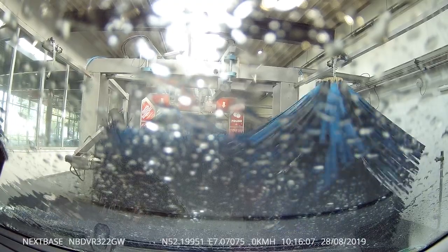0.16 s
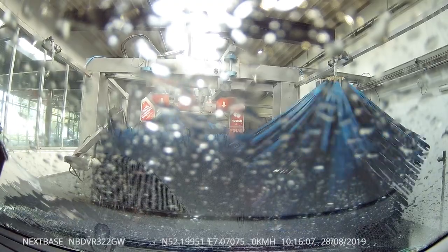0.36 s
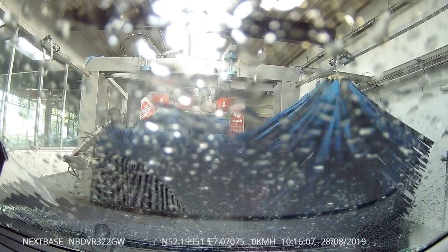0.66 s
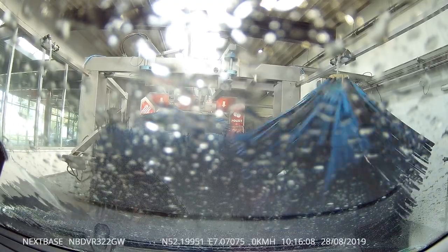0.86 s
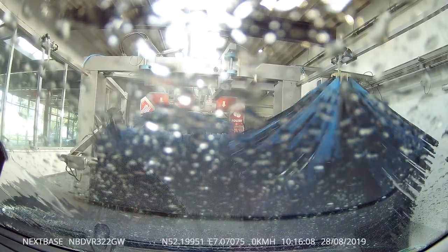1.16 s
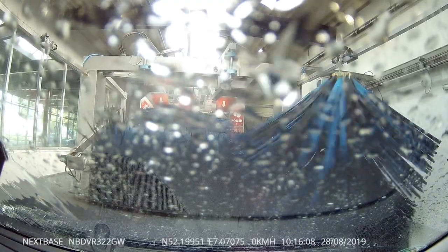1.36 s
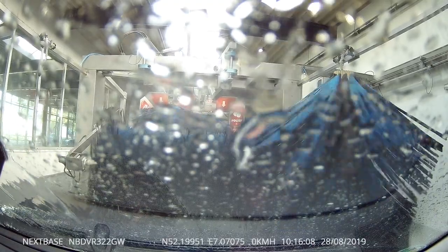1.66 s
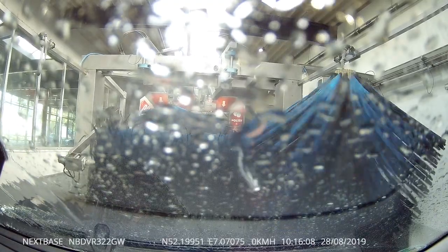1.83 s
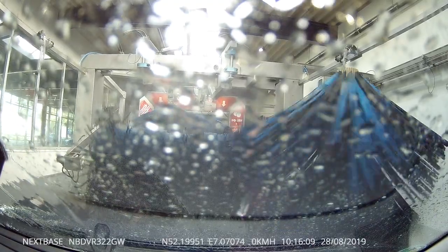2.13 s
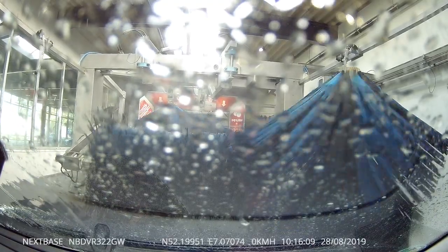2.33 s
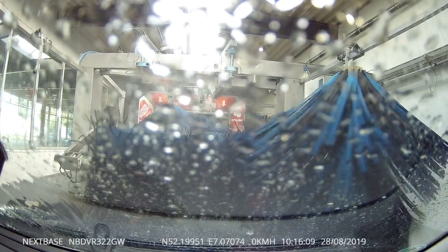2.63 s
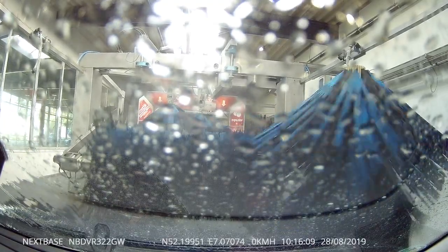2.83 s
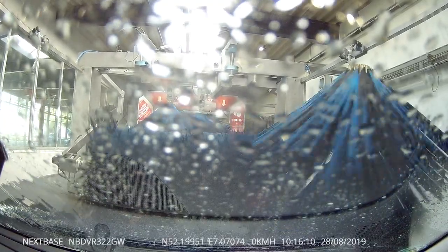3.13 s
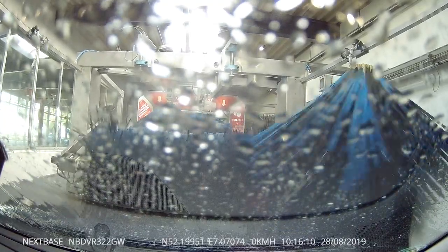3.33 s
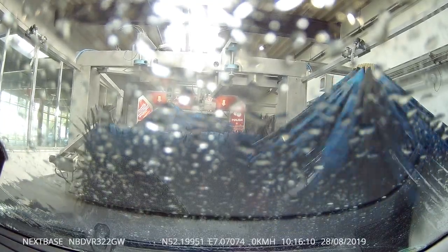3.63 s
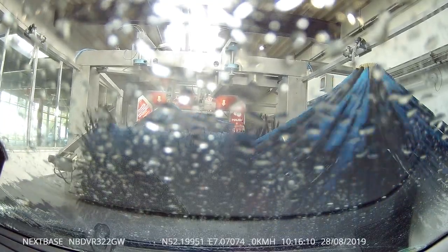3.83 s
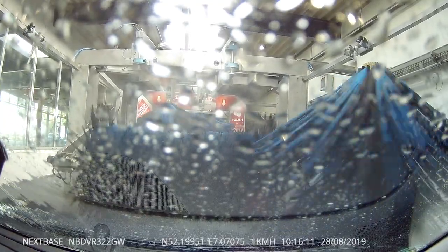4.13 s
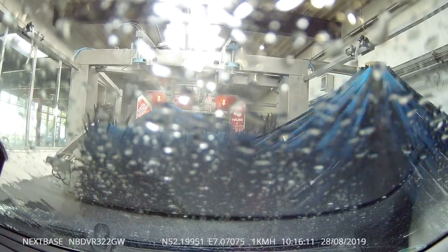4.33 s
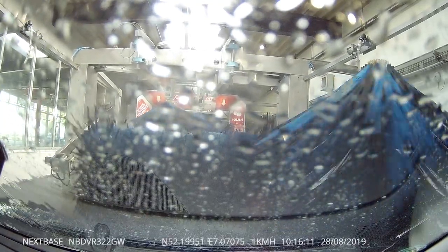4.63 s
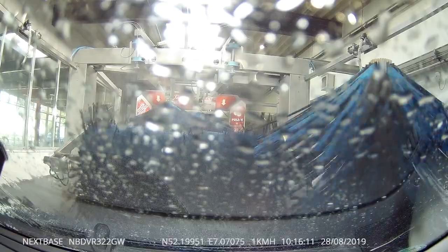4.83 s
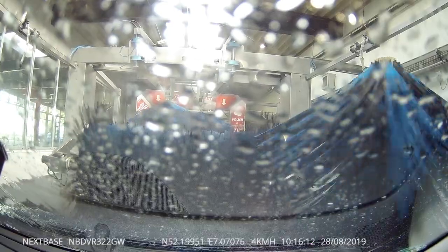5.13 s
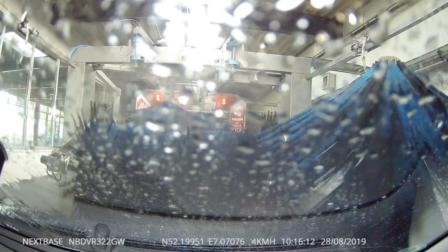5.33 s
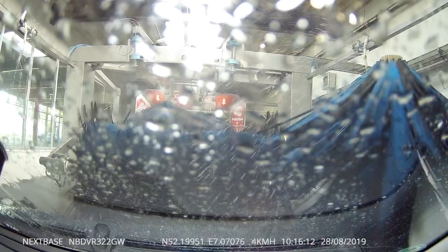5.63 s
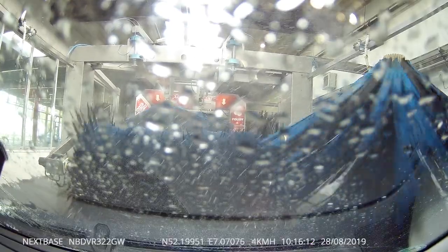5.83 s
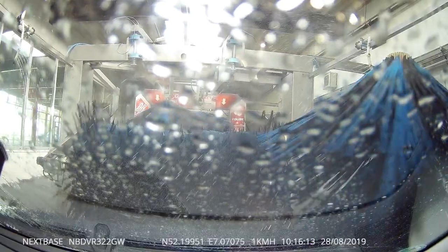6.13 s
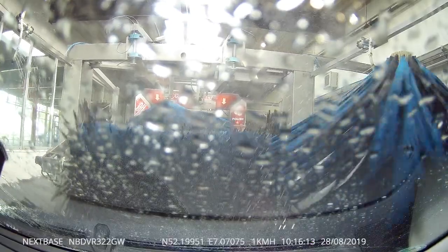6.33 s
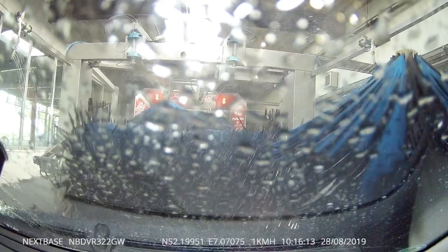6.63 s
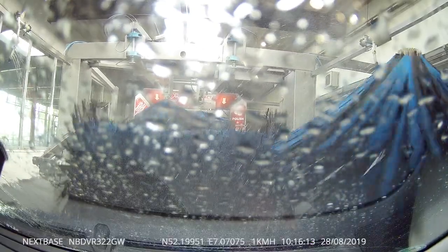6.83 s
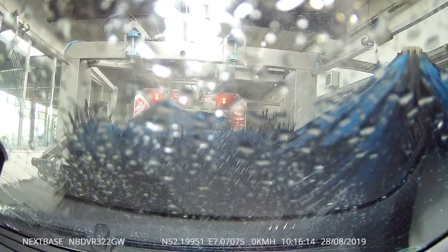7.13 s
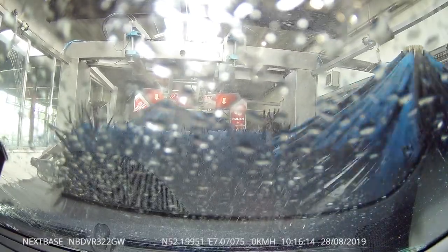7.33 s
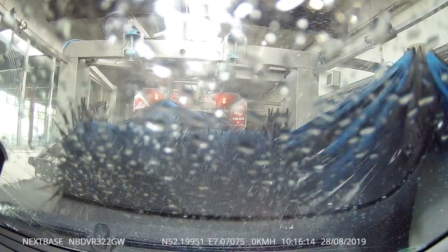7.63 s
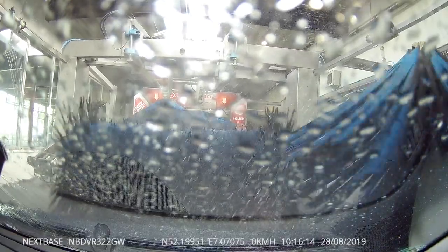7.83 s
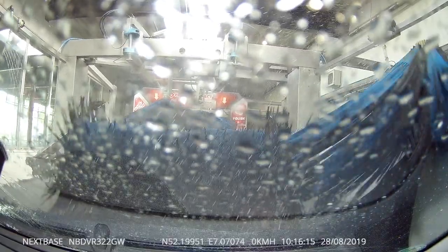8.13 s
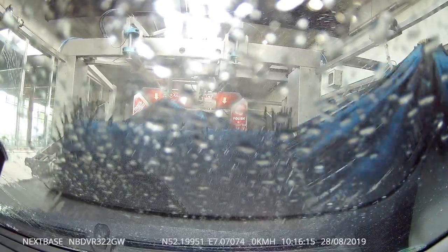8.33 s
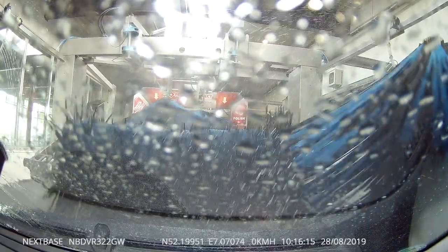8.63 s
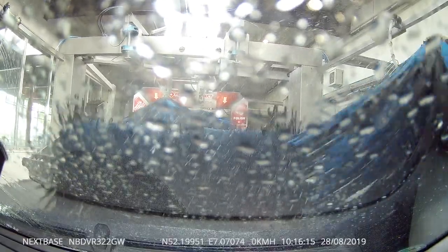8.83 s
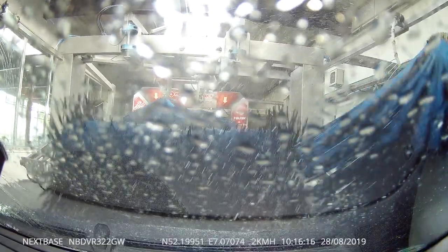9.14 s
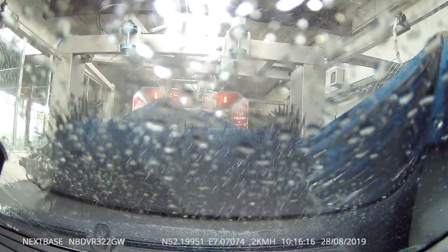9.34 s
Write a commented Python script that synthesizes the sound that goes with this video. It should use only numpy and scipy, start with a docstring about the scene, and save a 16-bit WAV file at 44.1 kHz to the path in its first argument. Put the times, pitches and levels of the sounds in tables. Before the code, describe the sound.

A close, dull, boxy cabin sound of spinning brushes working over a car. Irregular wet slaps and fine droplet ticks rattle on the glass, hollow knocks ring the metal, and low thuds push the air. It starts lighter, grows denser and boomier through the middle, then a wavering low drive hum rises, above faint steady hiss and a thin high warbling whine.

```python
"""Wet strips of spinning brushes lash the windscreen and drum on the bonnet, heard inside a car in a car wash.
Each strip is a tiny random impulse; the impulses clump, ring glass and panels, and make the closed cabin boom.
Lashes shed bursts of water ticks over a steady crackle of bristles and spray; strips knock on the metal.
Behind them a fluttering brush-drive hum grows as it nears, and a thin warbling whine sits over an even hiss."""
import sys
import numpy as np
from scipy import signal
from scipy.fft import rfft, irfft, next_fast_len
from scipy.io import wavfile
from scipy.ndimage import uniform_filter1d, map_coordinates

SR = 44100
rng = np.random.default_rng(int(sys.argv[2]) if len(sys.argv) > 2 else 0)


def store_pcm(level_fs):
    """Save levels as 16-bit WAV."""
    pcm = np.round(np.clip(level_fs, -1, 1) * 32767).astype(np.int16)
    wavfile.write(sys.argv[1], SR, np.atleast_2d(pcm).T)


N = 417627

# All table levels below are starting points: the functions add their own trims and random sway.
# Separate lashes of wet strips on the glass, from single ticks to heavy smacks. Each row: start in seconds,
# length in seconds (4 ms at least is used), smack level in dB, spatter level in dB,
# spatter brightness in dB per octave.
LASHES = [(0.064, 0.0066, -36, -45, 2.5), (.166, 0.013, -39, -52.5, -0.5), (0.187, 0.022, -36, -45.5, -1),
          (.265, 0.023, -38, -50.5, -3), (0.323, 0.0036, -31, -40.5, 0), (0.37, 0.015, -34.5, -44.5, -3),
          (0.448, 0.0036, -32, -51, -2), (0.559, .005, -41, -54, -3), (0.589, 0.0059, -37, -50.5, 5),
          (0.687, 0.009, -37, -49, -1.5), (0.706, 0.009, -32, -49.5, 1.5), (0.737, .007, -32, -45, -2.5),
          (.746, 0.0036, -37, -44, -1.5), (0.795, .008, -38.5, -49, 4), (0.818, .0045, -30, -41.5, 0.5),
          (0.866, 0.013, -41, -44.5, -2), (0.969, 0.0088, -33, -49, -3.5), (0.989, 0.023, -40, -45, -1),
          (1.015, 0.0055, -37, -38.5, 4), (1.024, 0.019, -41, -46.5, 3.5), (1.152, .018, -39, -49, -1),
          (1.23, 0.014, -35, -48, 3), (1.31, 0.017, -34.5, -47.5, -6), (1.534, 0.03, -42, -47.5, 7.5),
          (1.583, .018, -44, -42, -1.5), (1.644, 0.0086, -45, -53, 12.5), (1.693, .045, -37, -44, 2),
          (1.766, 0.031, -54, -50, 6), (1.831, 0.016, -39, -43.5, 2), (1.896, 0.029, -37, -44.5, -1.5),
          (1.947, 0.015, -40, -46.5, 0.5), (2.019, 0.016, -51, -44, 4.5), (2.119, 0.021, -41, -46, 6.5),
          (2.164, 0.017, -39, -48, 9.5), (2.289, 0.004, -48, -42, 5), (2.331, .012, -38, -52.5, -3),
          (2.428, 0.034, -38.5, -46, 10), (2.598, 0.031, -40, -49.5, 10.5), (2.747, 0.033, -40, -43.5, -1),
          (2.871, .016, -34.5, -50, -4), (2.921, .024, -40, -43.5, -4), (2.968, 0.013, -39, -43.5, -4),
          (2.985, .017, -32, -36.5, 3.5), (3.09, 0.02, -34, -39.5, 3), (3.16, 0.0061, -38, -43.5, 3),
          (3.192, .011, -36.5, -48.5, -5), (3.233, 0.029, -32.5, -44.5, -3), (3.294, 0.012, -34.5, -42, 1),
          (3.483, 0.013, -35, -41, 2), (3.51, 0.016, -33, -36.5, -2.5), (3.533, 0.032, -38, -40.5, -5),
          (3.612, .018, -36, -38.5, -1), (3.639, .03, -36.5, -40.5, -1.5), (3.722, 0.0072, -46, -45, 4),
          (3.775, 0.027, -30.5, -34, -5), (3.852, 0.028, -38, -43.5, -3.5), (3.893, .012, -39, -40.5, -1),
          (3.92, 0.014, -40, -41.5, -1.5), (4.102, 0.028, -36, -41.5, -0.5), (4.179, .014, -37, -40.5, -5),
          (4.203, 0.04, -38, -40.5, -7.5), (4.267, 0.022, -37.5, -38, -6), (4.372, 0.022, -44, -43.5, 1),
          (4.403, 0.023, -31.5, -37.5, -1), (4.423, 0.026, -37, -37.5, 3.5), (4.5, 0.027, -48, -50, 1),
          (4.609, 0.036, -38, -41.5, 0.5), (4.688, 0.012, -36, -46.5, -4.5),
          (4.766, 0.032, -34, -36.5, -4.5), (4.89, 0.041, -36.5, -45.5, 2.5),
          (4.929, 0.025, -33.5, -41.5, -2), (5.071, 0.024, -32.5, -38.5, -5),
          (5.131, 0.011, -34.5, -42, -2.5), (5.18, 0.038, -37, -43.5, 0), (5.352, 0.027, -42, -39, 2.5),
          (5.38, 0.05, -34.5, -38.5, 1), (5.472, 0.039, -32, -43.5, -7), (5.544, .037, -31, -40.5, -0.5),
          (5.654, 0.034, -30, -41.5, -2), (5.68, 0.035, -37, -37.5, 3), (5.735, 0.037, -50, -44.5, 1),
          (5.802, 0.037, -34, -39.5, -4), (6.057, 0.018, -32.5, -45.5, 0), (6.121, 0.03, -35, -42, -7.5),
          (6.224, 0.018, -32.5, -53.5, -6), (6.267, 0.026, -47, -39.5, -1.5), (6.449, .018, -35, -43, -2),
          (6.505, 0.033, -30.5, -47.5, 4), (6.596, 0.022, -32, -40, 0), (6.753, .014, -32.5, -41, 6),
          (6.823, 0.018, -31.5, -47.5, 1), (6.867, 0.038, -39, -39.5, -1), (6.999, 0.035, -37, -38, -2.5),
          (7.19, 0.02, -33, -42, 3.5), (7.252, 0.025, -32.5, -43.5, -0.5), (7.306, .02, -33.5, -45.5, -3.5),
          (7.386, 0.02, -35, -47.5, -4), (7.406, .011, -35, -43, 1), (7.494, 0.02, -41, -47, 2.5),
          (7.571, 0.015, -34, -42, 0), (7.595, 0.023, -36, -44, -4), (7.635, 0.021, -44, -40, -0.5),
          (7.769, 0.028, -39, -46.5, 4), (7.822, 0.021, -45, -44, 3.5), (7.907, 0.015, -37, -44, 2),
          (7.957, .018, -32.5, -49.5, 2.5), (8.018, 0.012, -37.5, -41.5, 2.5),
          (8.057, 0.026, -37, -42, -4.5), (8.138, 0.032, -34.5, -49.5, -8), (8.36, 0.013, -33, -49.5, 7.5),
          (8.389, 0.026, -38, -48.5, 6.5), (8.415, .012, -36, -48.5, 0.5), (8.559, 0.014, -39, -41, -3.5),
          (8.596, .013, -42, -47, -3.5), (8.732, .013, -44, -47.5, 0.5), (8.986, 0.034, -33, -48, -2.5),
          (9.058, 0.019, -33, -47, -7.5), (9.145, .014, -37, -44.5, -3.5), (9.295, .016, -35, -40.5, -15),
          (9.369, 0.038, -43, -44.5, 0)]
# How hard the brushes press on the glass. Each row: time in seconds, bristle level in dB, spray level in dB.
BRUSH_PRESSURE = [(0.0, -43, -54.5), (.4, -48.5, -60), (0.71, -50, -60), (1.03, -49, -58),
                  (1.55, -45.5, -55.5), (1.77, -43.5, -53), (2.14, -45, -52), (4.22, -40, -47.5),
                  (4.59, -42, -52), (5.11, -40.5, -46.5), (5.67, -35.5, -46), (7.252, -39.5, -48.5),
                  (7.91, -43, -52), (9.26, -38.5, -49.5), (9.47, -43.5, -50)]
# Colour of a drop heard through glass. Each row: frequency in Hz, relative density in dB per Hz.
DROP_COLOUR = [(1240, -16), (2050, -3), (2450, -2.8), (3100, -6.3), (3950, -5.4), (5340, -14.3),
               (5850, -14), (6970, -20), (9060, -51), (15300, -120)]
# Narrow modes of the windscreen and the dips between them. Each row: centre in Hz, width in Hz, gain in dB.
GLASS_MODES = [(1020, 40, -3.5), (1116, 40, 2), (1285, 30, 3), (1555, 30, -1.5), (1670, 31, -1),
               (1835, 52, 1), (2260, 45, -0.5), (2380, 50, 2), (2590, 50, -3.5), (2740, 45, 1.8),
               (2840, 45, 0), (3045, 40, -3.5), (3090, 55, 2.5), (4660, 40, 0)]
# Strips on the sheet metal, faint to loud. Each row: start in seconds, level in dB, centre of the ring in Hz.
KNOCKS = [(.046, -21, 563), (.12, -17, 190), (.145, -24, 597), (.204, -20, 487), (.21, -15.5, 200),
          (.226, -19, 517), (.302, -20.5, 560), (.352, -26, 600), (.428, -17, 190), (.483, -25.5, 576),
          (.669, -24.5, 620), (.729, -21, 420), (.87, -18, 181), (1.229, -27, 500), (1.312, -24, 520),
          (1.536, -22.5, 674), (1.662, -18, 400), (1.69, -15.5, 170), (1.772, -24, 680), (2.159, -19, 465),
          (2.272, -17, 160), (2.41, -18.5, 160), (2.6, -19, 480), (2.704, -22, 680), (2.859, -15, 600),
          (3.072, -18.5, 484), (3.142, -18, 170), (3.446, -17.5, 500), (3.655, -16.5, 484),
          (3.779, -16, 467), (3.96, -20.5, 716), (4.06, -14.5, 480), (4.279, -16, 450), (5.075, -22, 500),
          (5.172, -22, 700), (5.659, -17.5, 450), (5.883, -19, 592), (5.962, -19, 500), (6.2, -15.5, 610),
          (6.322, -18, 520), (6.53, -20, 500), (6.744, -16, 480), (6.803, -25, 700), (6.893, -16.5, 485),
          (7.097, -26, 680), (7.251, -17.5, 594), (7.402, -17, 507), (7.914, -16, 385), (7.965, -13.5, 190),
          (8.011, -17, 382), (8.07, -14.5, 420), (8.206, -12, 445), (8.411, -16.5, 450), (8.889, -22, 680),
          (9.396, -20, 620)]
# How hard the strips beat on the body. Each row: time in seconds, cabin boom level in dB,
# bonnet level in dB, side panel level in dB.
BODY_BEATING = [(0, -37.5, -33.5, -33), (.15, -37.5, -30, -29.5), (.45, -41, -36.5, -35),
                (.8, -32.5, -39.5, -34.5), (1.35, -42.5, -37.5, -35.5), (1.75, -35.5, -34, -33),
                (2.6, -31.5, -32.5, -32), (3.4, -30.5, -33.5, -32), (3.75, -28.5, -31.5, -29.5),
                (4.55, -29.5, -30.5, -32), (5.1, -27.5, -35.5, -31), (5.8, -26, -35.5, -29.5),
                (6.6, -28, -34.5, -30.5), (7.4, -28.5, -35, -31.5), (8.15, -29.5, -32.5, -30),
                (8.75, -30.5, -31.5, -31.5), (9.47, -30.5, -31.5, -29.5)]
# Resonances of bodywork, glass and cabin. Each row: centre in Hz, width in Hz, relative level in dB.
PANEL_MODES = [(72, 75, -3), (96, 35, -2), (159, 133, 1.5), (210, 39, -6.5), (273.3, 34, -5),
               (376, 130, -4), (440, 98, -1), (594, 220, -17), (615, 107, -5), (714, 110, -7.5),
               (850, 106, -9), (949, 105, -8), (1119, 220, -12), (1268, 250, -13), (1428, 260, -16),
               (1645, 540, -17), (1837, 190, -16), (2330, 1100, -23)]
# The brush shoves the whole body. Each row: start in seconds, level in dB.
BODY_SHOVES = [(.785, -20.5), (2.5, -20), (2.69, -17.5), (3.224, -18), (4.123, -16), (4.48, -18),
               (4.64, -16.5), (4.96, -19), (5.33, -15), (5.73, -15), (5.87, -14.5), (6.211, -11),
               (6.589, -14.5), (6.711, -15.5), (7.736, -19), (8.31, -17.5), (8.578, -18)]
# Colour of the cabin air's boom. Each row: frequency in Hz, relative density in dB per Hz.
BOOM_COLOUR = [(10, -55.5), (22, -16), (30, 2), (40, 9.5), (52, 0.5), (68, -9.5), (95, -32.5), (200, -120)]
# Decay of the cabin's reflections. Each row: frequency in Hz, time to fall by 60 dB in seconds.
CABIN_DECAY = [(100, 0.053), (700, 0.047), (2000, 0.061), (7000, 0.014)]
# The brush drive as it nears. Each row: time in seconds, hum level in dB.
DRIVE_LEVEL = [(0, -47.5), (5, -45), (6.3, -40.5), (7.3, -36.5), (8.2, -35.5), (8.75, -32.5), (9.47, -31.5)]
# The hum swells under load. Each row: centre of the swell in seconds, level in dB, pitch in Hz.
DRIVE_SURGES = [(8.355, -26, 302), (8.625, -24.5, 299), (9.15, -24, 298), (9.345, -25.5, 308),
                (9.41, -26, 299)]

# Rows of strips on the spinning brush: a steady beat, with the timing scatter of each row
ROWS_PER_S, FIRST_ROW_S, ROW_SCATTER_S = 12.33, .048, .01
ROW_LENGTH_S = 0.038  # typical; each row is stretched or shortened
ROW_SMACK_DB, ROW_SPATTER_DB = -2, -5  # added to the brush pressure levels
ROW_UNEVEN_DB, ROW_SPREAD_DB = -1, 5.5  # every second row is fuller; random range either way
# Tilt of a row's or flick's spatter in dB per octave, and its random range either way
BRIGHTNESS_DB, BRIGHTNESS_SPREAD_DB = -3, 3
# Stray strips: length, smack and spatter over the brush pressure levels, random range either way
FLICK_S, FLICK_SMACK_DB, FLICK_SPATTER_DB, FLICK_SPREAD_DB = 0.0078, 2, 1.5, 0.5
# Band of the glass under a smack, and how far it moves up or down from spot to spot
SMACK_LOW_HZ, SMACK_HIGH_HZ, SMACK_SHIFT_OCTAVES = 790, 2070, .3
RANDOM_KNOCK_DB, RANDOM_KNOCK_HZ = 12.5, 510  # level over the side panels; typical ring
ROOF_DB, ROOF_FOLLOWS = -37, 0.5  # mean roof level before sway; dB gained per dB of cabin boom
TOP_HZ = 7250  # upper band limit


def amp(db):
    """Turn decibels into gain."""
    return 10 ** (np.asarray(db) / 20)


def unit(x):
    """Scale to rms 1."""
    return x / np.sqrt(np.mean(x ** 2) + 1e-20)


def along(points, hz):
    """Read a curve of (Hz, value) points on a log frequency axis."""
    f, v = np.transpose(points)
    return np.interp(np.log(hz + 1), np.log(f + 1), v)


def curves(rows):
    """Draw one value per sample for each column after the time."""
    s, *cols = np.transpose(rows)
    return [np.interp(np.arange(N) / SR, s, c) for c in cols]


def wobble(rate):
    """Draw a smooth random curve with rate knots a second."""
    knots = rng.standard_normal(int(N * rate / SR) + 4)
    return map_coordinates(knots, [np.arange(N) * rate / SR], order=3)


def add(track, s, sound):
    """Mix a sound into the track at time s."""
    part = track[max(0, round(s * SR)):][:len(sound)]
    part += sound[:len(part)]


def through(x, response):
    """Play x through an impulse response."""
    return signal.oaconvolve(x, response)[:N]


def ringing(gain, size=8192):
    """Build the minimum-phase ring, of energy 1, that has this gain over frequency."""
    log_gain = np.log(np.maximum(gain(np.fft.rfftfreq(size, 1 / SR)), 1e-6))
    cepstrum = irfft(log_gain)
    # Fold the second half onto the first, so the ring starts at once
    cepstrum[1:size // 2] *= 2
    cepstrum[size // 2 + 1:] = 0
    response = irfft(np.exp(rfft(cepstrum)))
    return response / np.linalg.norm(response)


def bodywork(low_hz, high_hz, order=14):
    """Ring the panel resonances that lie between two frequencies."""
    def gain(hz):
        modes = sum(amp(db) ** 2 / (1 + (2 * (hz - c) / w) ** 2) ** 2 for c, w, db in PANEL_MODES)
        low_cut = 1 / (1 + (low_hz / (hz + 1)) ** order)
        high_cut = 1 / (1 + (hz / high_hz) ** order)
        return np.sqrt(modes * low_cut * high_cut)
    return ringing(gain)


def wet_glass(brightness_db=0, pivot_hz=3000):
    """Make the tick of one drop on the windscreen; finer drops are brighter."""
    def gain(hz):
        octaves = np.clip(np.log2((hz + 1) / pivot_hz), -.5, 1)
        return amp(along(DROP_COLOUR, hz) + brightness_db * octaves)
    return ringing(gain, size=1024)


def impacts(rate, spread_db, size):
    """Scatter random impulses of either sign, about rate a second, with uneven strength."""
    landed = rng.random(size) < rate / SR
    sign = rng.choice([-1, 1], size)
    return landed * sign * amp(spread_db * np.clip(rng.standard_normal(size), -2, 2))


def patter(response, rate, spread_db, clumps_db, even_s):
    """Rain endless clumped impacts on one surface, with the level evened to about rms 1 over even_s."""
    x = through(impacts(rate, spread_db, N) * amp(clumps_db), response)
    size = max(8, int(even_s * SR))
    power = uniform_filter1d(uniform_filter1d(x ** 2, size), size)
    return x / np.sqrt(np.abs(power) + 1e-12)


def splat(response, length, rate, spread_db, drip=0.16, rise=.25, snap_s=0):
    """Land a bundle of impacts with a snap worth snap_s of it, then thin it out; energy of rms 1 over length."""
    t = np.arange(int(3 * length * SR) + 512) / SR
    onset = np.minimum(t / (rise * length), 1)
    tail = np.exp(-np.maximum(t / length - .7, 0) / drip)
    hits = impacts(rate, spread_db, len(t)) * onset * tail
    hits[int(rise * length * SR)] += np.linalg.norm(hits) * np.sqrt(snap_s / length)
    x = signal.fftconvolve(hits, response)
    return x * np.sqrt(length * SR / (np.sum(x ** 2) + 1e-20))


def roaming(x, depth_db, span_hz, hold_s):
    """Shift the colour at random over time, as each spot on the glass favours other frequencies."""
    hz, t, z = signal.stft(x, SR, nperseg=256)
    cells = np.meshgrid(hz / span_hz, t / hold_s, indexing="ij")
    spots = rng.standard_normal((int(hz[-1] / span_hz) + 2, int(t[-1] / hold_s) + 2))
    colour = np.clip(map_coordinates(spots, cells, order=3), -2, 2)
    gain = unit(amp(depth_db * colour))
    return signal.istft(z * gain, SR, nperseg=256)[1][:N]


def lashing():
    """Wet strips smack the windscreen, ring the spot where they land and shed water as bursts of ticks."""
    smacks, water = np.zeros(N), np.zeros(N)
    shifts = 2 ** (SMACK_SHIFT_OCTAVES * np.array([-1.3, -.5, 0, 0.3, 0.75]))
    spots = [bodywork(SMACK_LOW_HZ * shift, SMACK_HIGH_HZ * shift, order=7) for shift in shifts]
    lashes = [*LASHES, *brush_rows(), *stray_flicks()]
    for s, length, smack_db, spatter_db, brightness_db in lashes:
        length = max(length, .004)
        spot = spots[rng.integers(len(spots))]
        smack = splat(spot, length, rate=2200, spread_db=2.2, drip=.42, rise=.18)
        drop = wet_glass(brightness_db)
        spatter = splat(drop, length, rate=2600, spread_db=2.4, drip=.5, rise=.33, snap_s=.0007)
        add(smacks, s, amp(smack_db - 1.55) * smack)
        add(water, s, amp(spatter_db - 1.85) * spatter)
    return smacks + roaming(water, depth_db=1.8, span_hz=800, hold_s=.025)


def brush_rows(wetness_db=2.5):
    """Land one lash per row of the brush, except near a separate lash; columns as in LASHES."""
    row = np.arange(int(N / SR * ROWS_PER_S))
    late, stretch, weight, wetness, fineness = rng.uniform(-1, 1, (len(row), 5)).T
    s = FIRST_ROW_S + row / ROWS_PER_S + ROW_SCATTER_S * late
    length = ROW_LENGTH_S * np.exp(0.86 * stretch)
    at, bristle_db, spray_db = np.transpose(BRUSH_PRESSURE)
    force_db = ROW_UNEVEN_DB * (-1) ** row + ROW_SPREAD_DB * weight
    smack_db = np.interp(s, at, bristle_db) + ROW_SMACK_DB + force_db
    spatter_db = np.interp(s, at, spray_db) + ROW_SPATTER_DB + force_db + wetness_db * wetness
    brightness_db = BRIGHTNESS_DB + BRIGHTNESS_SPREAD_DB * fineness
    # Keep only rows more than half a beat away from any separate lash
    free = np.abs(s[:, None] - np.transpose(LASHES)[0]).min(axis=1) > .5 / ROWS_PER_S
    return np.transpose([s, length, smack_db, spatter_db, brightness_db])[free]


def stray_flicks(count=110):
    """Tick single strips on the glass out of step with the rows; columns as in LASHES."""
    when, weight, fineness = rng.uniform(-1, 1, (count, 3)).T
    s = (np.arange(count) + np.abs(when)) / count * N / SR
    at, bristle_db, spray_db = np.transpose(BRUSH_PRESSURE)
    force_db = FLICK_SPREAD_DB * weight
    smack_db = np.interp(s, at, bristle_db) + FLICK_SMACK_DB + force_db
    spatter_db = np.interp(s, at, spray_db) + FLICK_SPATTER_DB + force_db
    brightness_db = BRIGHTNESS_DB + BRIGHTNESS_SPREAD_DB * fineness
    return np.transpose([s, np.full(count, FLICK_S), smack_db, spatter_db, brightness_db])


def scrubbing(clumps, bristle_gain_db=-0.67, spray_gain_db=-2.5, sway_db=0.95, stroke_db=1.03):
    """Bristle tips and flung water crackle on the glass, thicker with each clump and weaker between strokes."""
    bristle_db, spray_db = curves(BRUSH_PRESSURE) + sway_db * wobble(9.7) + stroke_db * stroke()
    glass, film = bodywork(895, 2100, order=7), wet_glass(brightness_db=-1.0)
    bristles = patter(glass, rate=2800, spread_db=3, clumps_db=1.7 * clumps, even_s=.07)
    spray = patter(film, rate=2400, spread_db=4, clumps_db=1.9 * clumps, even_s=.1)
    spray = roaming(spray, depth_db=2.2, span_hz=900, hold_s=.014)
    return amp(bristle_db + bristle_gain_db) * bristles + amp(spray_db + spray_gain_db) * spray


def stroke():
    """Follow the brush's beat: 1 while a row of strips sweeps the glass, -1 between rows."""
    t = np.arange(N) / SR
    return np.cos(2 * np.pi * ROWS_PER_S * (t - FIRST_ROW_S - ROW_LENGTH_S / 2))


def windscreen(x):
    """Ring the narrow modes of the glass with everything that lands on it."""
    def gain(hz):
        return amp(sum(db / (1 + (2 * (hz - c) / w) ** 2) for c, w, db in GLASS_MODES))
    return through(x, ringing(gain, size=4096))


def knocking(reach=1.3):
    """Strips knock on the metal, ringing the resonances within reach of each spot's centre."""
    out = np.zeros(N)
    for s, db, hz in [*KNOCKS, *random_knocks()]:
        spot = bodywork(hz / reach, hz * reach, order=8)
        knock = splat(spot, length=0.015, rate=1600, spread_db=4.0, drip=0.42, rise=0.03, snap_s=0.0068)
        add(out, s, amp(db - 10.5) * knock)
    return out


def random_knocks(count=5):
    """Land further strips at random, following the beating on the side panels; columns as in KNOCKS."""
    s = (np.arange(count) + rng.random(count)) / count * N / SR
    weight, spot = rng.uniform(-1, 1, (count, 2)).T
    at, _, _, panel_db = np.transpose(BODY_BEATING)
    level_db = np.interp(s, at, panel_db) + RANDOM_KNOCK_DB + 3 * weight
    return np.transpose([s, level_db, RANDOM_KNOCK_HZ * np.exp(0.13 * spot)])


def drumming(clumps, sway_db=1.76):
    """Soft strips beat roof, bonnet and side panels without pause; the smaller the panel, the higher it rings."""
    boom_db, bonnet_db, panel_db = curves(BODY_BEATING)
    roof_db = ROOF_DB + ROOF_FOLLOWS * (boom_db - boom_db.mean())
    roof = patter(bodywork(66, 117.7), rate=500, spread_db=2, clumps_db=0, even_s=0.13)
    roof = amp(roof_db + sway_db * wobble(8.3)) * roof
    bonnet = patter(bodywork(123.5, 272), rate=900, spread_db=2.5, clumps_db=0.7 * clumps, even_s=0.14)
    bonnet = amp(bonnet_db + 0.03 + sway_db * wobble(9)) * bonnet
    panels = patter(bodywork(279.0, 847), rate=1800, spread_db=3, clumps_db=2.0 * clumps, even_s=0.13)
    panels = amp(panel_db - 1.1) * panels
    return roof + bonnet + panels


def lull(events, depth_db, lull_s):
    """Thin the patter by a brief level dip around each event, as strips gather for it: gain over time."""
    gaps, t = np.zeros(N), np.arange(max(8, int(lull_s * SR)))
    for s, *_ in events:
        add(gaps, s - 0.82 * lull_s, np.sin(np.pi * t / len(t)))  # mostly ahead of the event
    return amp(-depth_db * np.minimum(gaps, 1))


def cabin_boom(mode_hz=41, swell_s=0.031, sway_db=4):
    """The flexing roof pumps the cabin air; each hard shove takes over and swells its lowest mode."""
    boom_db, _, _ = curves(BODY_BEATING)
    air = ringing(lambda hz: amp(along(BOOM_COLOUR, hz)), size=32768)
    level_db = boom_db - 0.5 + sway_db * np.minimum(wobble(12), .7)
    boom = amp(level_db) * patter(air, rate=400, spread_db=0.5, clumps_db=0, even_s=0.075)
    t = np.arange(SR // 3) / SR
    shove = (t / swell_s * np.exp(1 - t / swell_s)) ** 2  # peaks at 1 after swell_s
    swells, held = np.zeros(N), np.zeros(N)
    for (s, db), detune in zip(BODY_SHOVES, rng.standard_normal(len(BODY_SHOVES))):
        tone = np.sin(2 * np.pi * mode_hz * (1 + 0.029 * detune) * t)
        add(swells, s, amp(db - 3.0) * shove * tone)
        add(held, s, shove)
    return boom * (1 - .7 * np.minimum(held, 1)) + swells


def cabin(x, size=2048):
    """Short reflections from windows and trim: a decaying noise tail, drawn anew every 0.2 s."""
    out, step = np.zeros(N), SR // 5
    for start in range(0, N, step):
        hz, t, z = signal.stft(rng.standard_normal(size), SR, nperseg=128)
        decay = amp(-60 * t / along(CABIN_DECAY, hz)[:, None])
        tail = signal.istft(z * decay, SR, nperseg=128)[1]
        echoes = signal.fftconvolve(x[start:start + step], tail / np.linalg.norm(tail))
        add(out, start / SR + 0.001958, echoes)  # delay of the first reflection
    return out


def narrow(hz, width_hz):
    """Make a tone that flutters in level and phase, with width_hz random knots a second."""
    phase = 2 * np.pi * hz * np.arange(N) / SR
    return unit(wobble(width_hz) * np.cos(phase) + wobble(width_hz) * np.sin(phase))


def drive_hum(hum_hz=301, load_db=-0.5, surge_s=0.038):
    """The brush drive emerges from the wash as it nears, fluttering and surging under the changing load."""
    hum_db, = curves(DRIVE_LEVEL)
    t = np.arange(N) / SR
    core = unit(np.sin(2 * np.pi * hum_hz * t + 1.5 * wobble(15)))
    tone = unit(.6 * core + narrow(hum_hz, width_hz=42))
    hum = amp(hum_db + 1.0 + load_db * np.minimum(wobble(16), 1)) * tone
    for s, db, hz in DRIVE_SURGES:
        swell = np.exp(-((t - s) / surge_s) ** 2)
        steady = amp(db) * unit(np.sin(2 * np.pi * hz * t))
        hum = (1 - swell) * hum + swell * steady  # a steady tone briefly replaces the flutter
    return hum


def whine(pitch_hz=5870):
    """A thin electrical whine whose pitch warbles quickly, over a faint even hiss."""
    warble_hz = 30 * unit(wobble(60)) + 50 * narrow(24, width_hz=12) + 75 * unit(wobble(600))
    tone = amp(-68.5) * unit(np.sin(2 * np.pi * np.cumsum(pitch_hz + warble_hz) / SR))
    hiss = amp(-62.5) * rng.standard_normal(N)
    return tone + hiss


def scene():
    """Mix glass, bodywork, cabin reflections, drive and whine."""
    clumps = unit(wobble(30) + 0.5 * wobble(80))  # strips arrive in bunches
    before_knocks = lull(KNOCKS, depth_db=1.5, lull_s=0.026)
    before_lashes = lull(LASHES, depth_db=0.5, lull_s=0.019)
    glass = windscreen(lashing() + before_knocks * before_lashes * scrubbing(clumps))
    body = knocking() + before_knocks * drumming(clumps) + cabin_boom()
    reflections = amp(-12.0) * cabin(glass)
    return (glass + body + reflections + drive_hum() + whine())[None]


def record(dry):
    """Cut everything above TOP_HZ with a hard band limit."""
    size = next_fast_len(N + SR // 2)
    kept = np.fft.rfftfreq(size, 1 / SR) < TOP_HZ
    return irfft(rfft(dry, size) * kept, size)[:, :N]


dry = scene()
out = record(dry)
store_pcm(out)
```